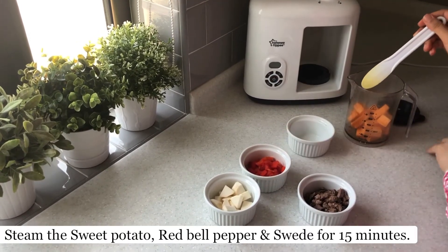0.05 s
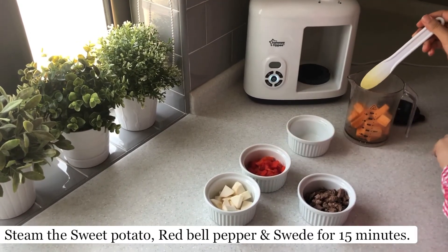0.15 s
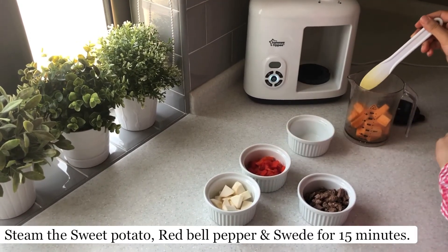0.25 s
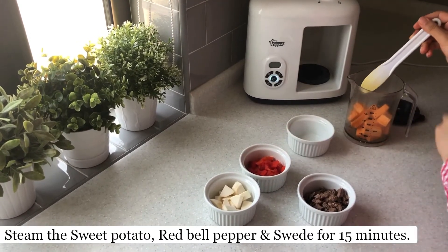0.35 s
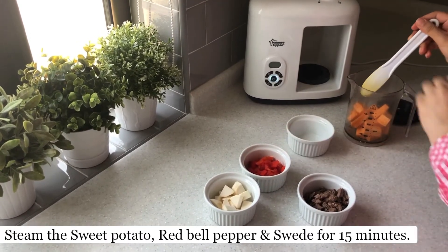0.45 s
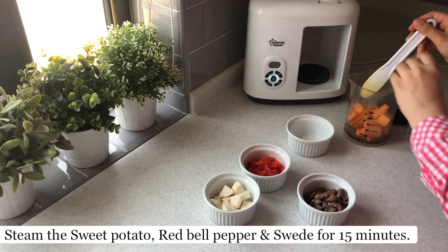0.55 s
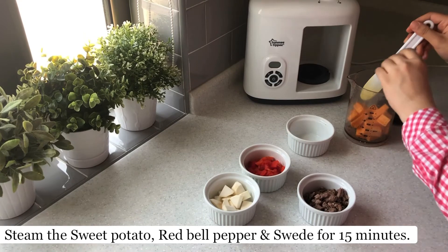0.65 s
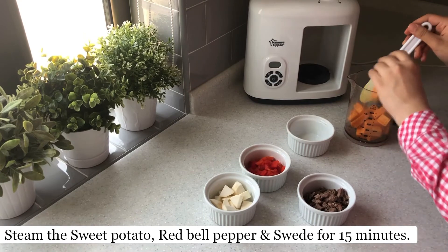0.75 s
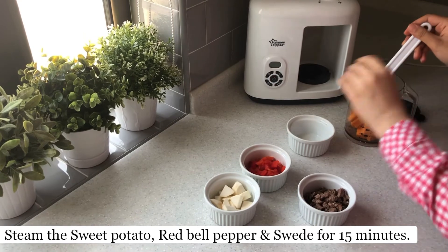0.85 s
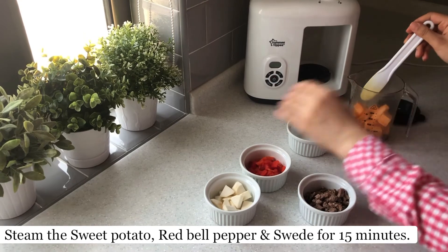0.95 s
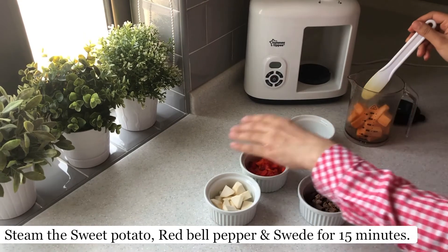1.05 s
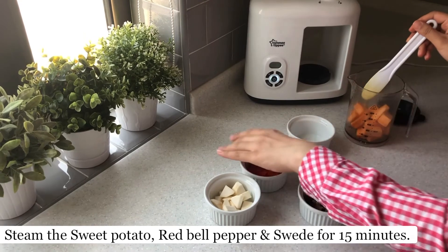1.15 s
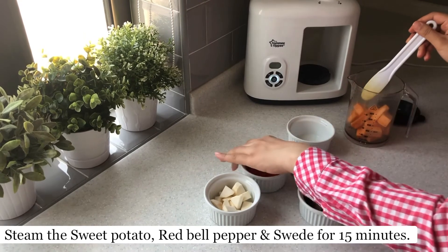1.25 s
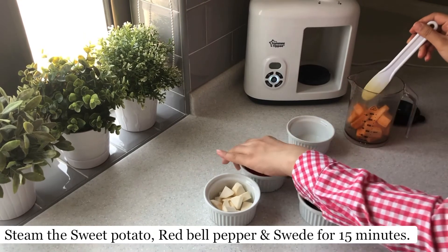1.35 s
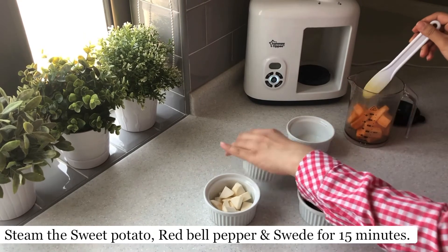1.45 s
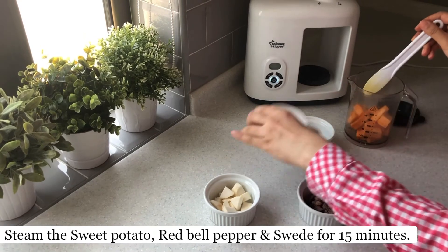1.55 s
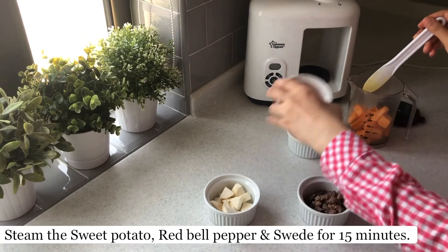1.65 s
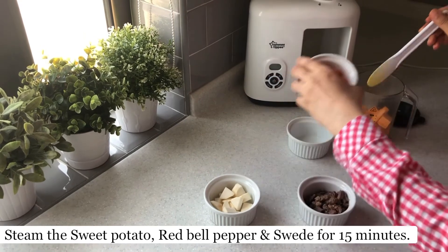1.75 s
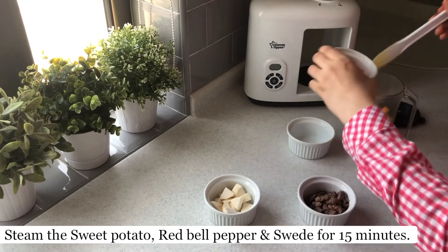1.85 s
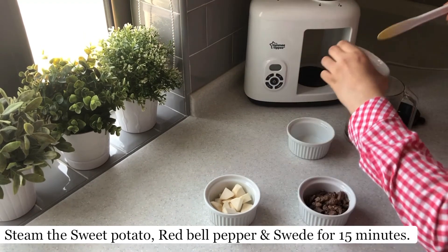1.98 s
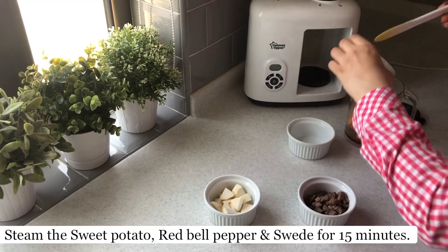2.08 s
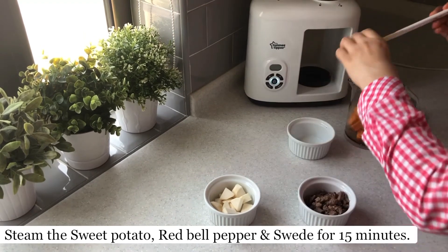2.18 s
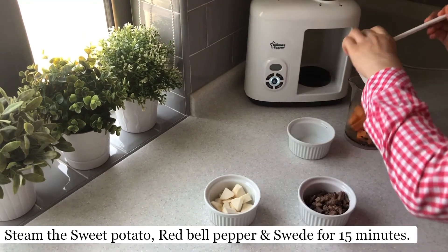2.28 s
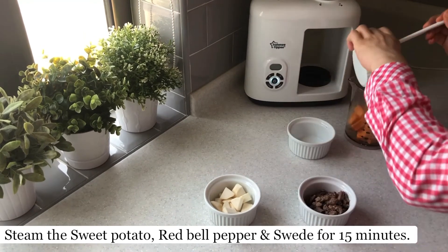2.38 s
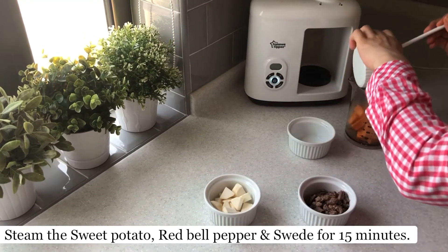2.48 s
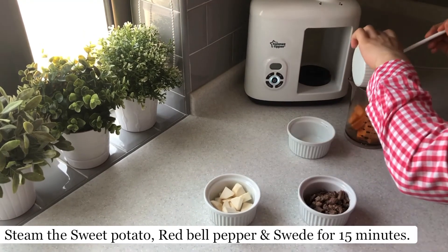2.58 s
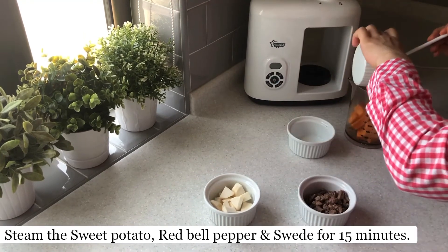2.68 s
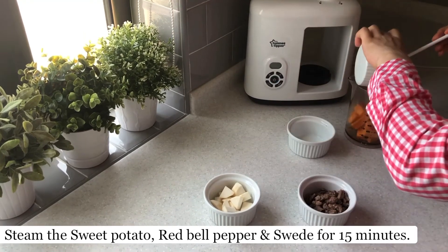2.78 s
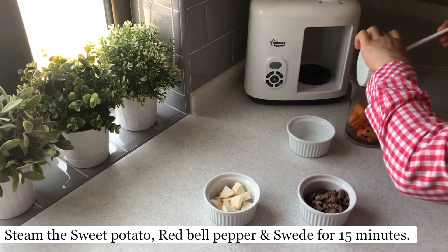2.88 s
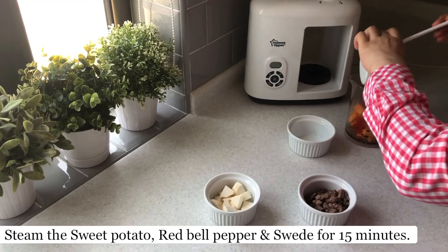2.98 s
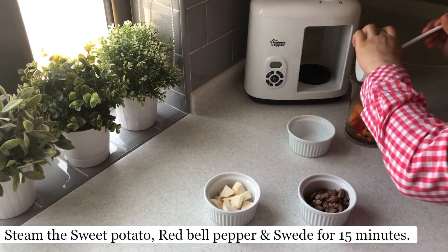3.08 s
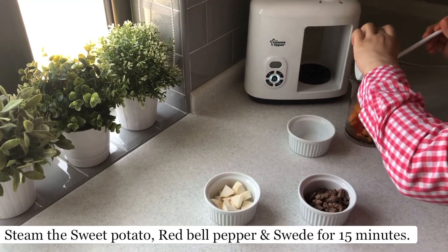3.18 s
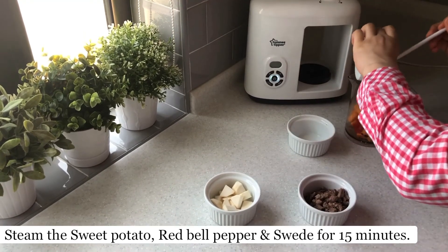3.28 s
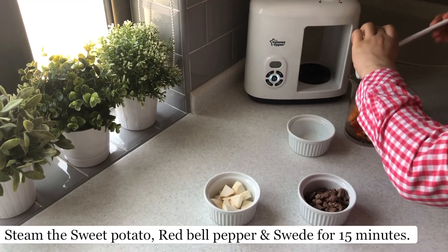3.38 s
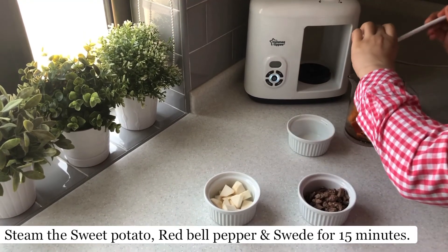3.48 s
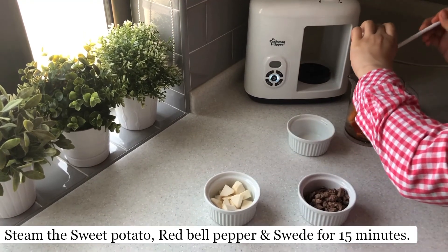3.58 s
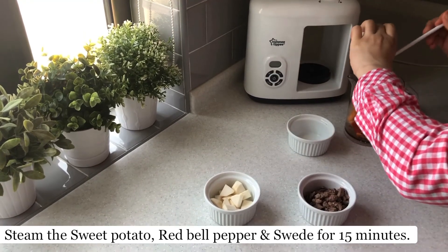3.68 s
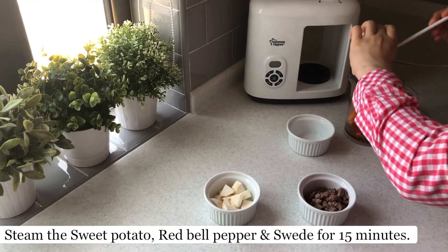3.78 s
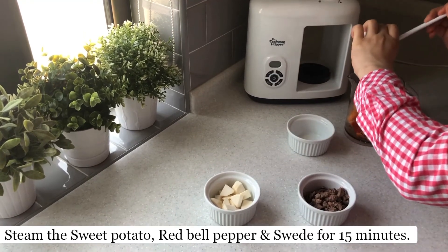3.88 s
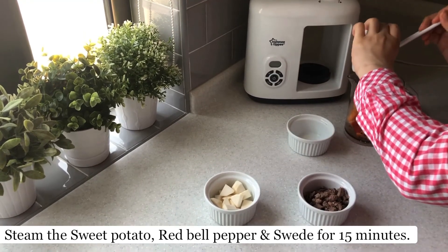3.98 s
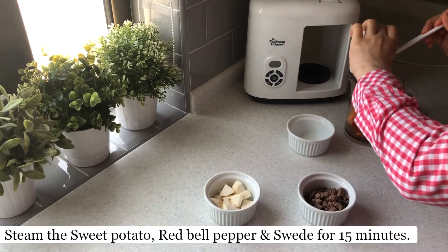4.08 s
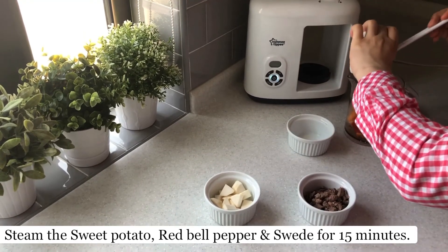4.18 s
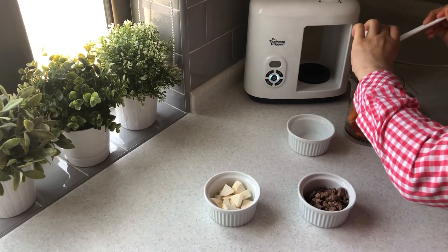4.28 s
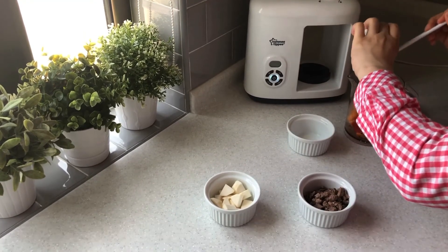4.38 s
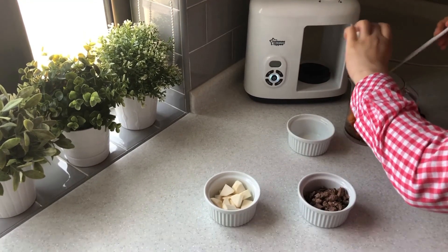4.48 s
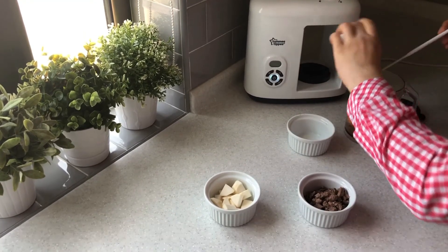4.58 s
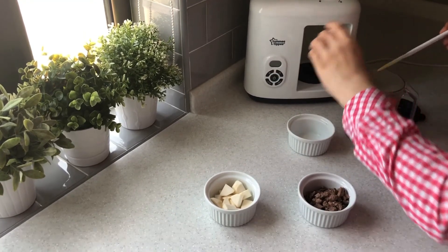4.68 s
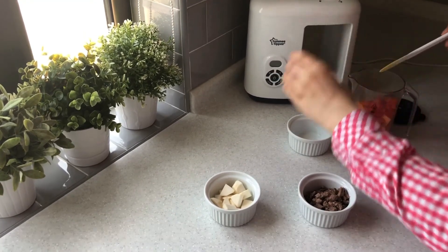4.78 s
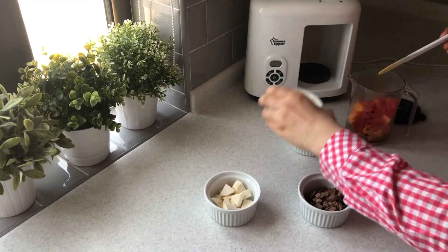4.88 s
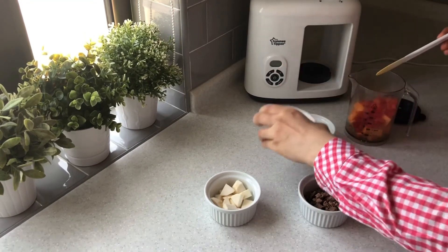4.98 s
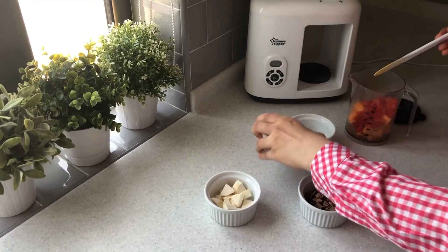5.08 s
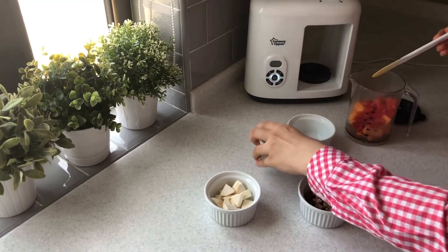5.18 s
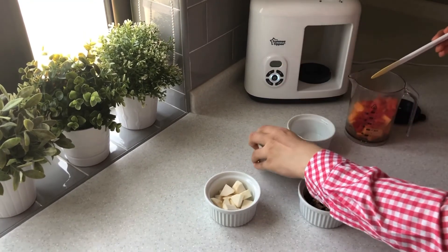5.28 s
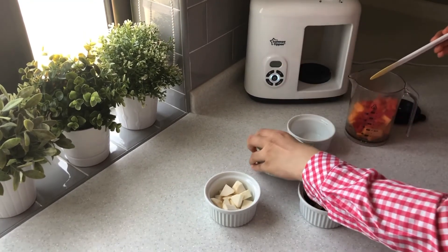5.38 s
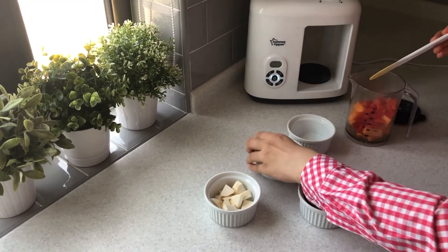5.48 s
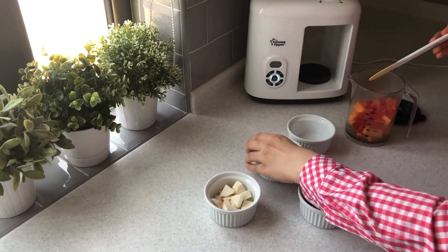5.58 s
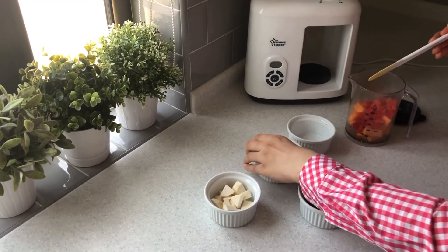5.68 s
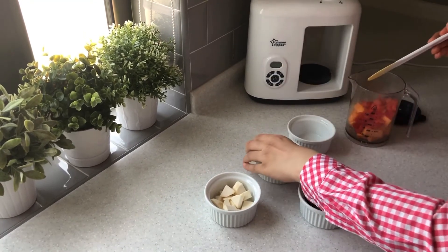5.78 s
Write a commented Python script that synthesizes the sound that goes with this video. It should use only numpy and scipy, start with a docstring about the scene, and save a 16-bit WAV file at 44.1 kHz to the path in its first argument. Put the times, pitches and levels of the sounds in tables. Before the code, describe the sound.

Chopped food drops into a hollow plastic jar as a spatula taps and scrapes a ceramic dish, which is then set down with two clacks.

```python
"""A small ceramic dish knocks on a kitchen counter, is emptied and is set down with two clacks.
Its rocking foot drives the counter's modes and the ceramic rings on. Chopped pepper tipped from it
thuds into a hollow plastic jar while a spatula ticks and scrapes against the dish.
A sleeve rustles faintly and an appliance hums in the hard-walled room."""
import sys
import numpy as np
from scipy import signal
from scipy.fft import rfft, irfft
from scipy.io import wavfile
from scipy.ndimage import uniform_filter1d

SR = 44100
rng = np.random.default_rng(int(sys.argv[2]) if len(sys.argv) > 2 else 0)


def pcm_store(signal):
    """Save signal as 16-bit PCM."""
    levels = np.round(np.clip(np.atleast_2d(signal), -1, 1) * 32767)
    wavfile.write(sys.argv[1], SR, levels.astype(np.int16).T)


N = 257981
TIME_S = np.arange(N) / SR
TOP_HZ = 15900

# Counter under the dish, and the free dish. Each row: mode in Hz, width in Hz, gain in dB.
COUNTER_MODES = [(105, 13, 11.5), (226, 34, 12), (372, 47, 13), (481, 83, 10.5), (655, 363, 12),
                 (850, 340, 16), (1100, 247, 17.5), (1251, 217, 18), (1380, 77, 20), (1517, 70, 24.5),
                 (1558, 200, 20), (1831, 206, 19), (1894, 150, 19), (2240, 370, 13), (2570, 184, 16),
                 (3270, 620, 10.5), (4510, 600, 6.5), (5500, 1800, 0.5)]
DISH_MODES = [(1430, 40, 0), (2678, 18, 19), (2740, 45, 15), (6180, 6, 16), (6944, 7, 15), (10900, 12, 11),
              (10990, 14, 7), (13800, 25, 15)]


def dish_knocks(touches=3, loss_db=6, ring_loss_db=18, softening=0.63, slowing_s=0.00377, crunch_db=-35):
    """The dish rocks, each touch weaker, softer and later; returns counter clacks and ceramic rings."""
    # Each row: start in seconds, blow in dB, contact cut-off in Hz, ring in dB, first rock in seconds.
    blows = [(1.3021, -10.5, 1006, -12, 0.00313), (1.313, -31.5, 2400, -17.5, 0.0034),
             (2.2789, -18, 1420, -35, 0.0063), (2.464, -30.5, 3030, -13.5, .003),
             (2.652, -24, 1560, -19, 0.00276), (4.224, -33.5, 2880, -12.5, .002),
             (5.3945, 1, 2750, 3, .0016), (5.5993, -3.5, 4550, 3.5, 0.0032)]
    clacks, rings = np.zeros((2, N))
    for start_s, db, first_hz, ring_db, rock_s in blows:
        for k in range(touches):
            contact_hz = first_hz * softening ** k
            force = disperse(contact(contact_hz), travel_s=0.000792)
            # The unglazed foot crunches more on a hard contact.
            crunch_gain = from_db(crunch_db) * (contact_hz / 4000) ** 2
            crunch = crunch_gain * cut(grit(fade_s=0.0022), 9000, "low", order=1)
            add(clacks, start_s, from_db(db - k * loss_db) * (resonate(force, COUNTER_MODES) + crunch))
            add(rings, start_s, from_db(ring_db - k * ring_loss_db) * resonate(force, DISH_MODES))
            start_s += rock_s + k * slowing_s
    return clacks, rings


def foot_drag(top_hz=3000):
    """The rough foot slides just before the dish tips up; friction drives the counter."""
    # Each row: peak time in seconds, level in dB.
    drags = [(1.301, -52.5)]
    force = rng.standard_normal(N) * swells(drags, rise_db_per_s=900, fall_db_per_s=2500)
    return resonate(cut(force + 1e-18, top_hz, "low"), COUNTER_MODES)


def jar_thuds(note_width_hz=58):
    """Bumps and landing food drive the jar, each with a hollow note set by where it lands."""
    # Each row: start in seconds, blow in dB, contact cut-off in Hz, note in Hz, note level in dB.
    thuds = [(.7385, -18.5, 990, 640, 11.5), (.7435, -9.5, 2020, 665, -4), (2.470, 1, 750, 526, -18),
             (2.488, -8, 380, 375, 3), (2.655, -11, 940, 1005, 5.5), (2.674, -5.5, 630, 533, 1),
             (2.781, -12, 1030, 493, 2), (2.96, -31, 680, 544, -3), (3.212, -11, 950, 525, -8),
             (4.157, -26.5, 1210, 584, -19)]
    # Each row: mode in Hz, width in Hz, gain in dB.
    jar_modes = [(103, 8.4, 15), (228.3, 10.7, 17), (382, 35, 3), (425, 127, 6), (580, 300, 1.5),
                 (739, 45, 6), (1110, 390, -0.5), (1430, 61, -35), (1790, 240, -24)]
    out = np.zeros(N)
    for start_s, db, contact_hz, note_hz, note_db in thuds:
        force = contact(contact_hz)
        hollow = resonate(force, [(note_hz, note_width_hz, note_db)])
        add(out, start_s, from_db(db) * resonate(force, jar_modes) + hollow)
    return out


def spatula_ticks(click_low_hz=2400, rough_db=-6):
    """A hard touch runs along the blade as a rough click; blade and hand-damped rim ring."""
    # Each row: start in seconds, blade in dB, rim in dB, click in dB.
    ticks = [(.736, -20.5, -42, -38), (2.950, -7, -7.5, -38), (3.404, -12.5, -8, -41),
             (3.562, -17.5, -31, -21), (3.8064, -13.5, 0.5, -25)]
    # Each row: mode in Hz, width in Hz, gain in dB.
    blade_modes = [(1030, 170, -0.5), (1465, 280, -4), (2140, 1200, -65), (3060, 50, -10),
                   (3870, 1270, -7.5), (5770, 170, -47), (6700, 300, -33)]
    rim_modes = [(2900, 50, 1.5), (5860, 630, -6), (6110, 93, 3), (6218, 170, 2), (6300, 540, -6),
                 (10900, 25, -6), (13440, 220, -24)]
    out = np.zeros(N)
    pulse = disperse(contact(TOP_HZ), travel_s=0.003)
    for start_s, blade_db, rim_db, click_db in ticks:
        force = pulse + from_db(rough_db) * grit(fade_s=0.004)
        blade = from_db(blade_db) * resonate(force, blade_modes)
        rim = from_db(rim_db) * resonate(force, rim_modes)
        click = from_db(click_db) * cut(force, click_low_hz, "high")
        add(out, start_s, blade + rim + click)
    return out


def scrapes_and_peels(peel_hz=13600, band_ratio=1.48):
    """The slipping blade makes brief friction noise; wet pieces peeling off do the same, far brighter."""
    # Each row: start in seconds, level in dB, band centre in Hz.
    scrapes = [(.616, -41, 2870), (.742, -25.5, 2240), (2.665, -39, 3750), (2.78, -32.5, 2720),
               (3.209, -34.5, 2030), (3.281, -36.5, 3100), (4.156, -38, 2600)]
    # Each row: start in seconds, level in dB.
    peels = [(2.679, -38.5), (3.251, -44), (3.69, -47)]
    out = np.zeros(N)
    for start_s, db, hz in list(scrapes) + [(*peel, peel_hz) for peel in peels]:
        slip = cut(grit(fade_s=0.006), [hz / band_ratio, hz * band_ratio], "band")
        add(out, start_s, from_db(db) * slip / np.linalg.norm(slip))
    return out


def handling(grain_db=4, rub_db=-10, rustle_low_hz=3000):
    """Fingers rubbing the glaze make two dish modes sing; sleeve and sliding food hiss as the arm moves."""
    # Each row: peak time in seconds, level in dB.
    grips = [(1.19, -52.5), (1.29, -52), (4.27, -57)]
    arm_moves = [(.52, -75.5), (1.15, -75), (2.2, -75), (2.65, -76), (4.7, -78)]
    grains = rms_one(rng.standard_normal(N) * from_db(grain_db * drift(rate_hz=54)))
    rub = grains * swells(grips, rise_db_per_s=400, fall_db_per_s=255)
    singing = from_db(rub_db) * resonate(rub, [DISH_MODES[1], DISH_MODES[4]])
    hiss = cut(grains, rustle_low_hz, "high", order=1)
    return singing + hiss * swells(arm_moves, rise_db_per_s=40, fall_db_per_s=40)


def kitchen_response(build_s=0.00011, early_db=4, early_s=0.03):
    """A flurry of echoes off worktop and walls, then a tail that dies band by band."""
    # Each row: frequency in Hz, T60 in seconds, level in dB.
    reverb = [(101, 0.48, -1), (294, 0.59, 4.5), (700, 0.52, 1.5), (1640, 0.65, 2), (3060, 0.51, -4.5),
              (6400, 0.37, -0.5), (13700, 0.33, -7)]
    t = TIME_S[:SR]
    white = rng.standard_normal((2, SR))
    tail = np.zeros(SR)
    edges_hz = np.geomspace(60, 17000, 13)
    for k, band_hz in enumerate(zip(edges_hz, edges_hz[1:])):
        t60_s = at_hz(reverb, np.sqrt(np.prod(band_hz)))
        tail += cut(white[k % 2], band_hz, "band") * from_db(-60 * t / t60_s)
    onset = (1 - np.exp(-t / build_s)) * from_db(early_db * np.exp(-t / early_s))
    spectrum = rfft(tail * onset)
    # Diffuse field: about equal energy in neighbouring bands.
    spectrum /= np.sqrt(uniform_filter1d(np.abs(spectrum) ** 2, size=90) + 1e-9)
    colour = from_db(at_hz(reverb, np.fft.rfftfreq(SR, 1 / SR), column=2))
    return irfft(spectrum * colour)[:SR * 3 // 4]


def appliance_hum():
    """Low motor tones, most of them wavering in level and phase."""
    # Each row: frequency in Hz, level in dB, waver from 0 to 1.
    tones = [(58.6, -75.5, 0.98), (92.7, -55.5, 0), (115.4, -65.5, 1), (236, -68.5, 0.2),
             (471.7, -70, 0.96)]
    out = np.zeros(N)
    for hz, db, waver in tones:
        swing = 1 + waver * (drift(rate_hz=13) + 1j * drift(rate_hz=8.7))
        tone = np.real(swing * np.exp(2j * np.pi * hz * TIME_S))
        out += from_db(db) * rms_one(tone)
    return out


def room_air(above_300_hz_db=-63):
    """Steady noise, strongest in the bass."""
    # Each row: frequency in Hz, relative density in dB.
    density = [(22, -56), (42, 6.5), (60, 3), (110, -3), (160, -1), (250, -2), (400, -7.5), (520, -8),
               (800, -14), (1300, -21.5), (2600, -28.5), (4000, -28), (7000, -36), (15000, -43)]
    colour = from_db(at_hz(density, np.fft.rfftfreq(N, 1 / SR)))
    air = irfft(rfft(rng.standard_normal(N)) * colour, N)
    return air * from_db(above_300_hz_db) / np.std(cut(air, 300, "high", order=6))


def contact(cutoff_hz):
    """Force of one blow: the softer the contact, the lower the cut-off."""
    return cut(signal.unit_impulse(SR // 2) + 1e-18, cutoff_hz, "low", order=3)


def disperse(x, travel_s):
    """Bending waves carry treble faster than bass; travel_s is the delay at 1 kHz."""
    hz = np.fft.rfftfreq(len(x), 1 / SR)
    lag_rad = 4 * np.pi * travel_s * np.sqrt(1000 * hz)
    return irfft(rfft(x) * np.exp(-1j * lag_rad), len(x))


def grit(fade_s):
    """Rough contact: a dying noise burst of unit energy."""
    t = TIME_S[:SR // 2]
    burst = rng.standard_normal(len(t)) * np.exp(-t / fade_s) + 1e-18
    return burst / np.linalg.norm(burst)


def resonate(force, modes):
    """Parallel two-pole resonances of alternating sign."""
    out = 0
    for k, (hz, width_hz, peak_db) in enumerate(modes):
        radius = np.exp(-np.pi * width_hz / SR)
        poles = [1, -2 * radius * np.cos(2 * np.pi * hz / SR), radius ** 2]
        gain = (-1) ** k * from_db(peak_db) * (1 - radius ** 2) / 2
        out += gain * signal.lfilter([1, 0, -1], poles, force + 1e-18)
    return out


def swells(peaks, rise_db_per_s, fall_db_per_s):
    """Gain of gestures that grow to a peak and die away."""
    return sum(from_db(db - np.maximum(rise_db_per_s * (peak_s - TIME_S), fall_db_per_s * (TIME_S - peak_s)))
               for peak_s, db in peaks)


def drift(rate_hz):
    """Random curve through unit-variance knots."""
    knots = rng.standard_normal(400)
    return np.interp(TIME_S * rate_hz, np.arange(len(knots)), knots)


def from_db(db):
    """Decibels to gain."""
    return 10 ** (np.asarray(db) / 20)


def rms_one(x):
    """Scale to unit rms."""
    return x / np.sqrt(np.mean(x ** 2) + 1e-20)


def at_hz(rows, hz, column=1):
    """Interpolate a column over log frequency."""
    rows = np.array(rows)
    return np.interp(np.log(np.maximum(hz, 1)), np.log(rows[:, 0]), rows[:, column])


def cut(x, hz, kind, order=2):
    """Butterworth filter."""
    return signal.sosfilt(signal.butter(order, np.clip(hz, 10, .47 * SR), kind, fs=SR, output="sos"), x)


def add(track, start_s, sound):
    """Mix a sound into a track."""
    start = max(round(start_s * SR), 0)
    track[start:start + len(sound)] += sound[:N - start]


def scene(jar_direct_db=-2, jar_wet_db=-1, ring_wet_db=-4):
    """Direct and reflected sound over air and hum; the jar stands farther back."""
    clacks, rings = dish_knocks()
    clacks += foot_drag()
    rings += handling()
    at_jar = jar_thuds() + spatula_ticks() + scrapes_and_peels()
    direct = clacks + rings + from_db(jar_direct_db) * at_jar
    to_walls = clacks + from_db(ring_wet_db) * rings + from_db(jar_wet_db) * at_jar
    reflected = signal.fftconvolve(to_walls, kitchen_response())[:N]
    return (direct + reflected + room_air() + appliance_hum())[None]


def record(dry, low_cut_hz=36):
    """The microphone drops the deepest bass; the top is cut steeply."""
    thinned = cut(dry, low_cut_hz, "high", order=4)
    return signal.sosfilt(signal.ellip(10, .1, 70, TOP_HZ, fs=SR, output="sos"), thinned)


dry = scene()
out = record(dry)
pcm_store(out)
```